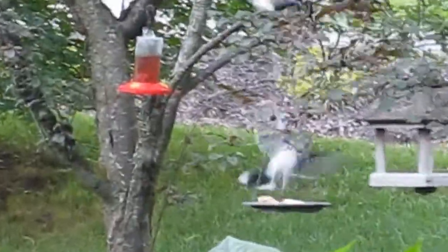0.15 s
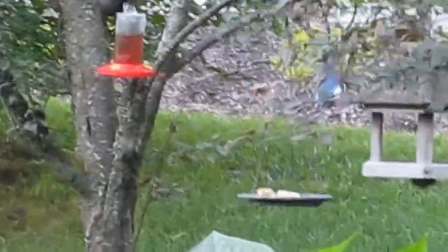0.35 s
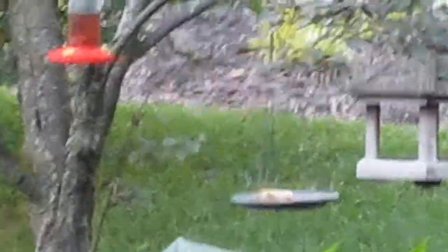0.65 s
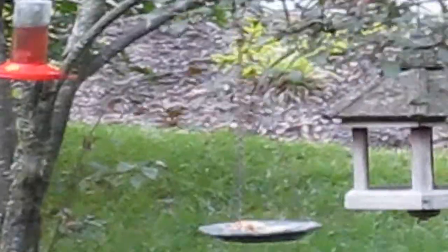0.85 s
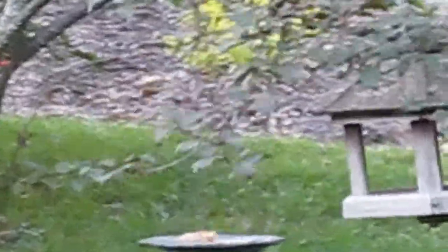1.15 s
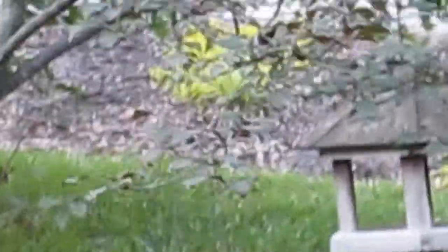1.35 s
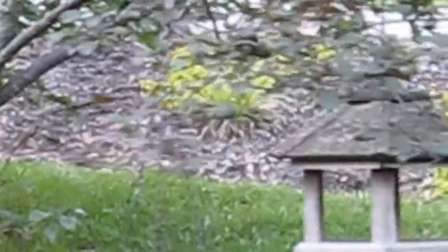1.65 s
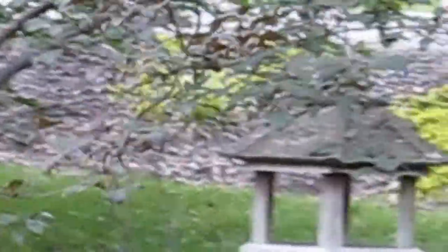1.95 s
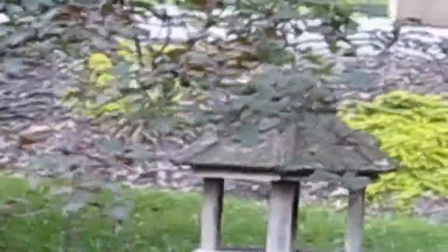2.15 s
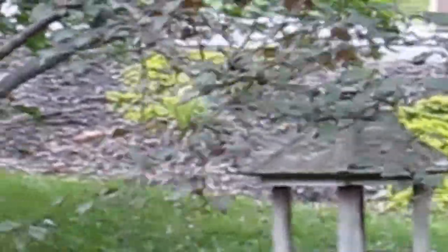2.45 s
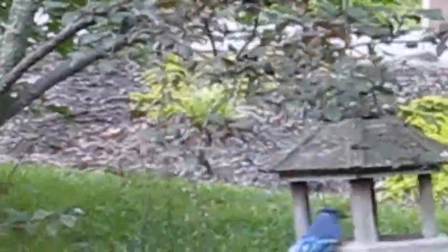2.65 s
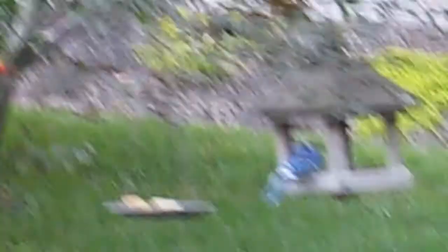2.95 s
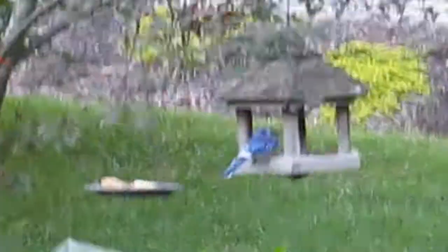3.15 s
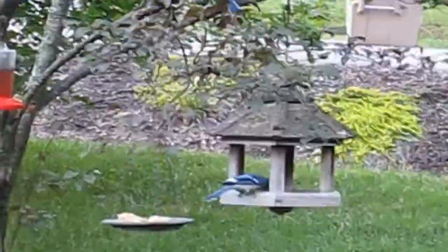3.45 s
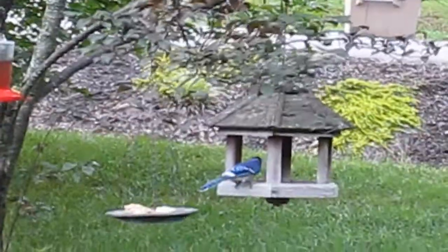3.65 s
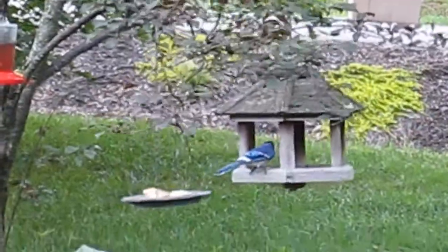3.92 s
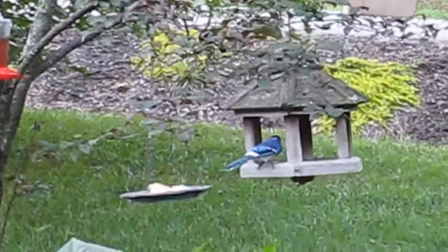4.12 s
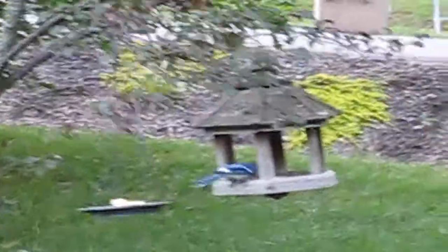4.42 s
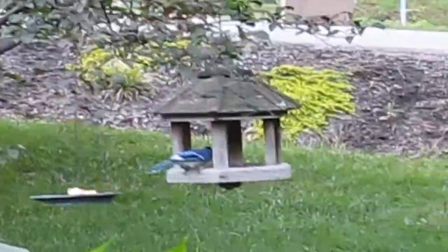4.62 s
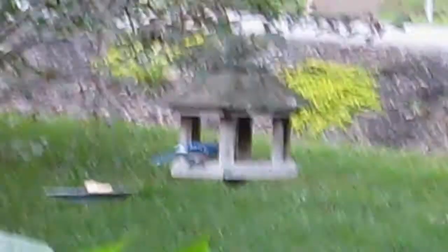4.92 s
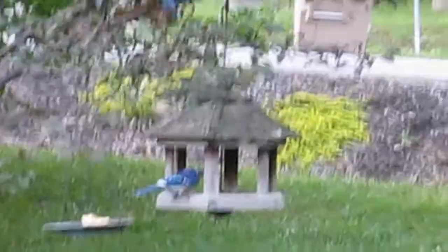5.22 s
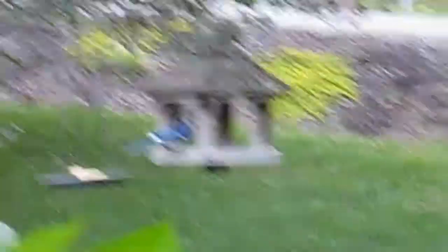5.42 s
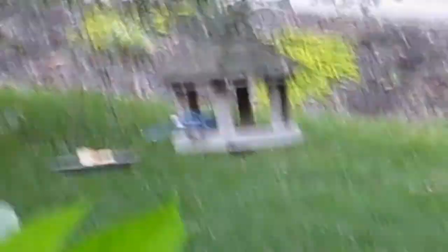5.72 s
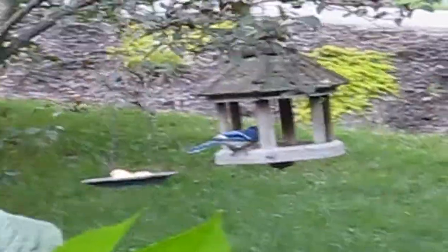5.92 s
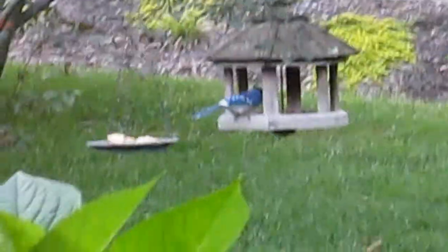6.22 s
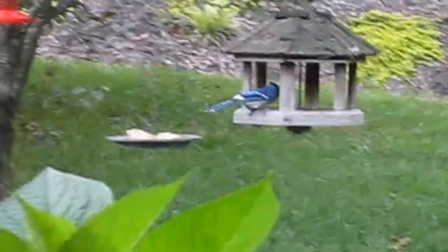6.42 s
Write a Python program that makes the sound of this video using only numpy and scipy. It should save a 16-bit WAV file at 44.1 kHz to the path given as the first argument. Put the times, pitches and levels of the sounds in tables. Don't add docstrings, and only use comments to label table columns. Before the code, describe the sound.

A small handheld camera's microphone hears a garden: constant hiss of leaves and far traffic, faint insect buzzing and muttering birds. Jays give nasal, sliding cries, the strongest around one second, the later two quieter and clearer. Dry plastic clicks from the housing are much closer than the birds: one hard snap early, a crackling cluster in the middle, a single strong click after it, and small ticks later.

```python
import sys
import numpy as np
from scipy import signal
from scipy.fft import rfft, irfft, next_fast_len
from scipy.io import wavfile
from scipy.ndimage import uniform_filter1d

SR = 44100
rng = np.random.default_rng(int(sys.argv[2]) if len(sys.argv) > 2 else 0)


def volts_from_db(level):
    exponent = np.asarray(level, float) / 20
    return 10 ** exponent


def wav_out(sig):
    wavfile.write(sys.argv[1], SR, np.round(np.clip(np.atleast_2d(sig).T, -1, 1) * 32767).astype(np.int16))


N = 289737

# f/Hz, density/dB per Hz
AIR_SPECTRUM = [(15, -38), (25, -6), (70, 2), (216, -2), (351, -2), (424, -4.5), (485, -2), (618, -5),
                (926, -8), (2800, -12), (3380, -11.5), (5640, -15.5), (7790, -23), (8450, -23),
                (15700, -28.5)]
# t/s, level/dB
CHATTER = [(0, -5), (.4, .4), (.8, -1.5), (1.9, -0.3), (2.2, 1.6), (3.7, -1.5), (4.2, 0.1), (4.6, -1.5),
           (6.57, -0.9)]
# t/s, swell and fall/s, level over the hiss/dB
LEAF_STIRS = [(.5, 0.77, 2.5), (1.4, .15, 2), (1.94, 0.13, 5), (2.15, .05, 3.5), (2.3, .08, 1),
              (2.6, 0.037, 3.5), (2.7, .03, 8.5), (2.85, .2, 3), (3.32, .04, 4), (3.64, 0.045, 3),
              (3.82, .07, 5), (4.2, .2, 2.5), (4.45, .07, 6.5), (4.66, .06, 3.5), (4.92, 0.14, 5.5),
              (5.13, .04, 3), (5.55, .2, 4), (5.88, .04, 3), (6.02, .04, 1), (6.46, .08, 2.2)]
# t into the phrase/s, length/s, start f/Hz, end f/Hz, level/dB
WREN_SLURS = [(.01, .055, 1780, 2180, -50), (.07, .05, 1930, 2330, -48), (.11, .04, 2150, 3500, -43),
              (.15, .05, 2200, 3700, -41.5), (.205, .035, 3300, 4600, -44), (.245, .05, 2300, 4400, -42),
              (.3, .04, 2450, 3250, -46), (.31, .045, 3250, 3950, -49)]
# t/s, level/dB
WREN_PHRASES = [
    (2.335, 0.5),
    (2.72, 1.5),
    (3.11, 0.2),
]
# t/s, level/dB
INSECT_BUZZES = [(.15, -68), (.42, -65), (.68, -63), (1.22, -62), (1.56, -64), (1.83, -63), (2.3, -65)]
# t/s, length/s, f/Hz, level/dB
PEEP_NOTES = [(.267, .085, 2320, -55), (.48, .06, 8200, -67), (3.661, .055, 1340, -50),
              (5.29, .045, 1350, -49.5), (5.78, .13, 11850, -69), (5.82, .06, 8400, -67),
              (5.9, .079, 3840, -59), (5.95, .12, 10300, -67), (6.19, .065, 8400, -63),
              (6.52, .05, 2250, -55), (6.52, .05, 8400, -66)]
# t/s, length/s, f/Hz, level/dB
HOARSE_MUTTERS = [(0.519, 0.037, 6450, -48), (.63, .038, 5460, -53), (.872, .017, 1350, -45),
                  (1.38, .07, 3000, -54), (1.575, .06, 3280, -47.5), (1.705, 0.028, 1410, -48),
                  (1.82, .049, 3200, -53), (1.99, .078, 1800, -50), (2.17, 0.043, 550, -46.5),
                  (2.719, 0.054, 5500, -49), (3.37, .06, 5500, -50), (3.78, .048, 9500, -61),
                  (4.04, .13, 1890, -57), (4.05, .28, 3370, -57), (4.26, .083, 1300, -54),
                  (4.549, 0.03, 1240, -46), (5.291, .04, 2420, -45.5), (5.999, .043, 4570, -50),
                  (6.1, 0.068, 1300, -49.5), (6.101, 0.051, 2500, -48.5), (6.16, .06, 2900, -45),
                  (6.325, .015, 9800, -59), (6.35, .052, 1890, -51), (6.435, .04, 9500, -58.5),
                  (6.425, .04, 15000, -61)]
# t/s, length/s, f/Hz, level/dB
WING_FLICKS = [
    (2.68, .025, 11000, -55),
    (4.625, .033, 4500, -49.5),
    (5.875, .02, 11000, -58),
    (6.432, .065, 2140, -40.5),
]
# t/s, length/s, start f/Hz, end f/Hz, level/dB
THIN_NOTE = (5.745, .19, 5760, 5500, -59)
# f/Hz (first row: share of the low mode), level/dB, t60/s
SHELL_MODES = [(1, 9.5, 0.0073), (2550, 2, 0.0063), (3800, 9.5, 0.0033), (6660, 10, 0.0025),
               (10050, 8.5, 0.0013)]
# t/s, peak level/dB, low-mode f/Hz, crack level/dB
HOUSING_SLIPS = [(1.7554, -36, 1300, -8), (1.8342, -39, 1840, -4), (2.146, -38, 1870, -10),
                 (2.159, -36, 1780, -19), (2.17, -34, 1620, -27), (2.1795, -28, 1600, -28),
                 (2.1891, -28, 1600, -31), (2.1997, -26.5, 1540, -22), (2.2275, -29, 1650, -29),
                 (2.2783, -21.5, 1620, -34), (2.363, -18.5, 1570, -32), (2.397, -21, 1750, -34),
                 (2.4173, -22.5, 1990, -29), (2.4325, -20.5, 1620, -37), (2.5464, -20.5, 1325, -28),
                 (3.3252, -10, 1470, -28), (4.6245, -34, 1270, -10), (6.0025, -42, 1300, -18),
                 (6.266, -47, 1230, -10)]
# t/s, peak level/dB, low-mode level/dB, high-mode level/dB, crack level/dB
BIG_SNAP = [
    (.8995, -9, -12, -5, -1.5),
    (.9002, -4, -4, -8, -16),
    (.901, -11, -2.5, -12, -22),
]
# t/s, f/Hz, level/dB, t60/s
JOLT = (.8998, 130, -3, .011)
# t/s, length/s, start f/Hz, end f/Hz, level/dB
FAR_CALLS = [
    (2.25, 0.075, 935, 932, -49.5),
    (2.64, 0.17, 937, 926, -52),
    (3.521, .18, 925, 918, -51),
    (4.79, 0.26, 941, 951, -46.5),
]
# multiple, level/dB
FAR_HARMONICS = [(2, -4.), (3, 6.5), (4, 7), (5, -38), (6, -9)]
# t/s, pitch f/Hz, effort level/dB, rasp level against the clean tone/dB, brightness/dB per octave
CALL_ENDING = [(0, 823, -21.5, -4, -2.5), (.05, 812.6, -25.5, 2.2, -2.5), (.092, 790.4, -28, 1.5, -1),
               (.13, 760, -53, 0, -1)]
SCREAM_CURVE = [(.7, 727, -60, -1.5, -17), (.728, 743, -44, -.6, -17), (.802, 750, -45, -1.5, -15),
                (.885, 809, -33, -10.5, -10), (.925, 829, -34, -11, -5), (.975, 830, -27.5, -9, -1),
                (1.06, 817, -26, -1.5, 1), (1.125, 778, -27, -1.5, 0.5), (1.175, 745, -45, 4, -1.5)]
CLEAR_CURVE = [(4.725, 702, -58, -12, 2.5), (4.743, 759, -38.5, -14, 3), (4.765, 788, -38, -13, 1.5),
               (4.86, 790, -37.5, -13, -1), (4.93, 788, -36.5, -14, -4.5), (5.011, 778, -35.5, -6, -4),
               (5.09, 745, -45.5, 0, 3)]
LAST_CURVE = [(5.34, 712, -52, -6, 1.5), (5.352, 738, -42, -9, 1.5), (5.395, 767, -38, -13, 3),
              (5.5, 757.6, -40, -16, -2), (5.586, 755.4, -38, -9, -.6), (5.64, 747, -41, -3, -3.5),
              (5.682, 730, -44, 1.5, -4.5), (5.7, 722, -62, 0, -5)]
THROAT_LEVELS = [
    (-18, -15.5, -3.5, -5, -4, -18, -17, -20),
    (-11, -12, .2, -4, 3, -2.5, -7, -17),
    (-10, -3, 1.1, -3, -2.5, -13, -9, -16),
    (-8.5, -4, 1.5, -6, 1.5, -11, -10, -15),
]


def in_time(rows):
    s, *columns = np.transpose(rows)
    return [np.interp(np.arange(N) / SR, s, c) for c in columns]


def at_hz(points, hz):
    table_hz, table_db = np.transpose(points)
    return np.interp(np.log(hz), np.log(table_hz), table_db)


def drift(rate, size):
    knots = rng.standard_normal(1000 * (size // SR + 1))
    return np.interp(np.arange(size) * rate / SR, np.arange(len(knots)), knots) * 1.22


def ring(x, hz, width_hz):
    r = np.exp(-np.pi * width_hz / SR)
    poles = [1, -2 * r * np.cos(2 * np.pi * hz / SR), r * r]
    return signal.lfilter([(1 - r * r) / 2, 0, (r * r - 1) / 2], poles, x)


def add(out, at_s, x):
    i = round(at_s * SR)
    out[i:i + len(x)] += x[:N - i]


def fade(size, rise_s, fall_s):
    t = np.arange(size) / SR
    return np.clip(t / rise_s, 0, 1) * np.clip((t[-1] - t) / fall_s, 0, 1)


def garden_echo(x, t60, onset_s):
    t = np.arange(SR) / SR
    tail = rng.standard_normal(SR) * volts_from_db(-60 * t / t60) * (1 - np.exp(-t / onset_s))
    unit_tail = tail / np.sqrt(np.sum(tail ** 2))
    wet = signal.fftconvolve(x, unit_tail)[:N]
    analytic = signal.hilbert(wet, next_fast_len(N))[:N]
    return np.real(analytic * np.exp(1.7j * drift(70, N)))


def rustle():
    hiss_db = -1.5
    t = np.arange(N) / SR
    stirs = [db * np.clip(1 - np.abs(t - s) / swell_s, 0, 1) for s, swell_s, db in LEAF_STIRS]
    return hiss_db + np.max(stirs, axis=0)


def air():
    air_db = -45
    rustle_db, (chatter_db,) = rustle(), in_time(CHATTER)
    size = next_fast_len(N)
    hz = np.arange(size // 2 + 1) * SR / size + 1
    noise = rfft(rng.standard_normal(size)) * volts_from_db(at_hz(AIR_SPECTRUM, hz))
    noise = noise / irfft(noise, size).std()
    octaves, gust, out = np.log2(hz), drift(30., N), 0
    for centre in np.arange(4, 14.5, .5):
        band = irfft(noise * np.clip(1 - 2 * np.abs(octaves - centre), 0, 1), size)[:N]
        top = np.clip((centre - 12.) / 0.75, 0, 1)
        middle = np.clip((centre - 9.8) / 0.45, 0, 1) * (1 - top)
        flicker_db = (middle + top) * (.9 * gust + 1.1 * drift(18, N))
        out = out + band * volts_from_db(top * rustle_db + middle * chatter_db + flicker_db)
    return volts_from_db(air_db) * out


def wren():
    out = np.zeros(N)
    for s, phrase_db in WREN_PHRASES:
        for into_s, length, start_hz, end_hz, level_db in WREN_SLURS:
            size = round(length * SR)
            quaver_hz = .05 * abs(end_hz - start_hz) * drift(180., size)
            detune = 1 + 0.01573 * rng.standard_normal()
            pitch_hz = np.linspace(start_hz, end_hz, size) * detune + quaver_hz
            tone = 2 * np.sin(2 * np.pi * np.cumsum(pitch_hz) / SR)
            add(out, s + into_s, volts_from_db(phrase_db + level_db) * np.hanning(size) ** .35 * tone)
    return volts_from_db(-9) * out + volts_from_db(2) * garden_echo(out, t60=.95, onset_s=.015)


def mutters():
    # t/s, length/s, f/Hz, level/dB, width/Hz, throbs per s
    rows = [(s, 0.086, 8830, db, 350, 90) for s, db in INSECT_BUZZES]
    rows += [(*row, 160, 28) for row in PEEP_NOTES]
    rows += [(*row, 0.23 * row[2], 44.4) for row in HOARSE_MUTTERS]
    rows += [(*row, 0.71 * row[2], 109) for row in WING_FLICKS]
    out = np.zeros(N)
    t = np.arange(SR // 4) / SR
    for s, length, hz, level_db, width_hz, throbs in rows:
        breath = ring(rng.standard_normal(SR // 2), hz, width_hz)
        tone = ring(breath, hz, width_hz)[SR // 4:SR // 4 * 2]
        rise = np.clip(t / (.15 * length), 0, 1)
        decay_db = -5 * np.clip(t / (.25 * length) - 2.5, 0, None)
        throb = 1 + 0.34 * np.sin(2 * np.pi * throbs * t)
        add(out, s, volts_from_db(level_db) * rise * volts_from_db(decay_db) * throb * tone / tone.std())
    return out


def whistle():
    s, length, start_hz, end_hz, level_db = THIN_NOTE
    out, size = np.zeros(N), round(length * SR)
    tone = np.sin(2 * np.pi * np.cumsum(np.linspace(start_hz, end_hz, size)) / SR)
    waver_db = 2 * drift(30, size)
    add(out, s, volts_from_db(level_db + waver_db) * fade(size, rise_s=.02, fall_s=.05) * tone)
    return out


def struck(hz, level_db, t60):
    t = np.arange(SR // 20) / SR
    contact = 1 - np.exp(-3. * hz * t)
    return volts_from_db(level_db - 60 * t / t60) * np.sin(2 * np.pi * hz * t) * contact


def slips():
    firm_db, firm_low_db, firm_high_db = -21.5, -10, -10.5
    faint_tilt = 0.53
    rows = []
    for s, peak_db, low_hz, crack_db in HOUSING_SLIPS:
        tilt_db = faint_tilt * max(firm_db - peak_db, 0)
        rows.append((s, peak_db, firm_low_db - tilt_db, firm_high_db + tilt_db, crack_db, low_hz))
    leads_s = np.cumsum(.001 * 1.21 ** np.arange(4))
    for k, lead_s in enumerate(leads_s):
        rows.append((BIG_SNAP[0][0] - lead_s, -9 - 4. * k, -5.5, 0, -18, 1570))
    return rows + [(*row, 1322) for row in BIG_SNAP]


def housing():
    out, rows = np.zeros(N), slips()
    signs = rng.choice([-1, 1], len(rows))
    for (s, peak_db, low_db, high_db, crack_db, low_hz), sign in zip(rows, signs):
        kicks_db = (low_db, -4., high_db, crack_db, crack_db)
        for k, (hz, mode_db, t60) in enumerate(SHELL_MODES):
            mode_hz = hz * low_hz if k == 0 else hz
            add(out, s, sign * (-1) ** k * struck(mode_hz, peak_db + kicks_db[k] + mode_db, t60))
    add(out, JOLT[0], struck(*JOLT[1:]))
    return out


def jay_voice(pitch_hz, rasp_db, partials, odd_db, bright_db):
    size, rasp = len(pitch_hz), volts_from_db(rasp_db)
    phase = 2 * np.pi * np.cumsum(pitch_hz * (1 + .02 * rasp * drift(300., size))) / SR
    out, power = 0, 0
    for k, partial_db in partials:
        muting_db = odd_db * (k % 2) * min(k / 5, 1) * (k < 10)
        opening_db = bright_db * np.clip(np.log2(k / 4.6), -.3, .85)
        flutter_db = 2.8 * drift(24.85, size)
        level = volts_from_db(partial_db + muting_db + opening_db + flutter_db)
        spread = rasp * volts_from_db(4.5 * np.log2(k / 5)) / np.sqrt(2)
        blur = 1 + spread * (drift(900, size) + 1j * drift(900, size))
        out = out + level * np.imag(blur * np.exp(1j * k * (phase + k)))
        power = power + level ** 2 * (.5 + spread ** 2)
    return out / np.sqrt(uniform_filter1d(power, size=1500))


def near_jay():
    calls = (CALL_ENDING, SCREAM_CURVE, CLEAR_CURVE, LAST_CURVE)
    upper_levels_db, upper_loss_db = (-25, -20, -22.5, -17.5), 1.9
    closed_db, odd_loss = -4, 1.1
    out = np.zeros(N)
    for rows, throat, upper_db in zip(calls, THROAT_LEVELS, upper_levels_db):
        start_s = rows[0][0]
        span = slice(round(start_s * SR), round(rows[-1][0] * SR))
        pitch_hz, effort_db, rasp_db, bright_db = (c[span] for c in in_time(rows))
        size = len(pitch_hz)
        partials = list(enumerate(throat, start=2))
        partials += [(10 + k, upper_db - upper_loss_db * k) for k in range(9)]
        odd_db = odd_loss * np.minimum(bright_db - closed_db, 0)
        if start_s > 0:
            odd_db = odd_db - 11. * (1 - fade(size, rise_s=.18, fall_s=1e-6))
        edges = fade(size, rise_s=min(start_s, .006) + 1e-6, fall_s=0.0037)
        voice = jay_voice(pitch_hz, rasp_db, partials, odd_db, bright_db)
        add(out, start_s, volts_from_db(effort_db) * edges * voice)
    return out


def far_jay():
    out = np.zeros(N)
    for s, length, start_hz, end_hz, level_db in FAR_CALLS:
        pitch_hz = np.linspace(start_hz, end_hz, round(length * SR))
        voice = jay_voice(pitch_hz, -3.5, FAR_HARMONICS, 0, 0)
        add(out, s, volts_from_db(level_db) * fade(len(voice), rise_s=0.02, fall_s=0.06) * voice)
    return out


def jays():
    near, far = near_jay(), far_jay()
    near_echo = volts_from_db(-8.0) * garden_echo(near, t60=0.4, onset_s=0.0034)
    return near + near_echo + far + volts_from_db(0.5) * garden_echo(far, t60=1.0, onset_s=.01)


def scene():
    return (jays() + wren() + mutters() + housing() + air() + whistle())[None]


def band_limit(x):
    return signal.sosfilt(signal.butter(12, 16240, fs=SR, output="sos"), x)


def record(dry):
    notched = dry - ring(dry, 7870, 1040)
    limited = np.clip(notched, -.99, .99)
    top_cut = signal.ellip(10, .5, 60, 15800, fs=SR, output="sos")
    return band_limit(signal.sosfilt(top_cut, limited))


dry = scene()
out = record(dry)
wav_out(out)
```